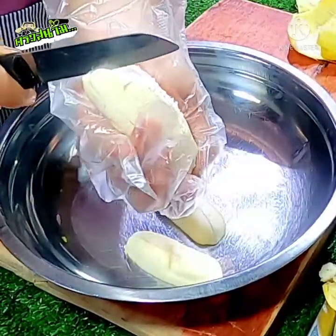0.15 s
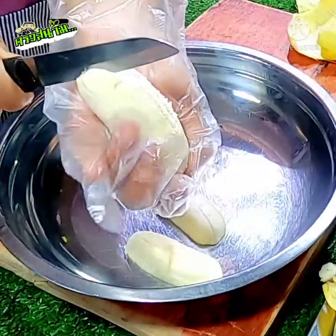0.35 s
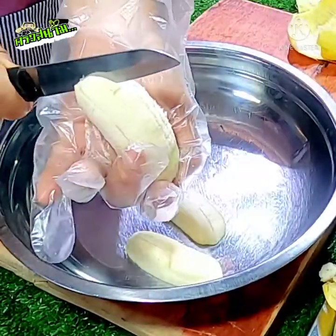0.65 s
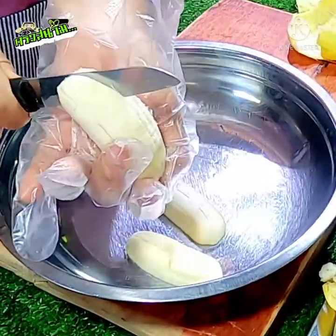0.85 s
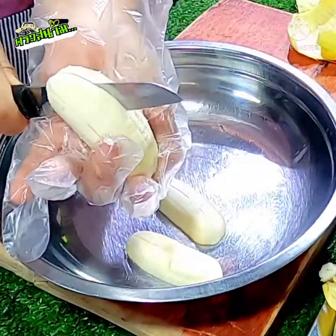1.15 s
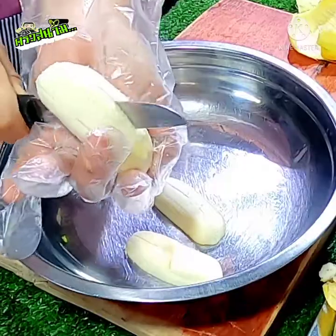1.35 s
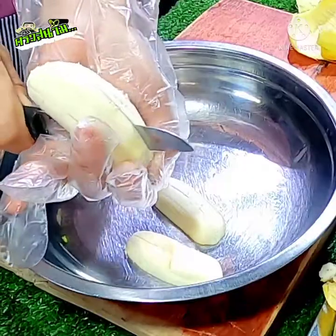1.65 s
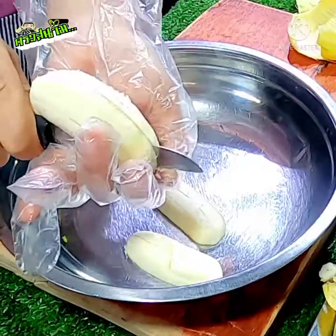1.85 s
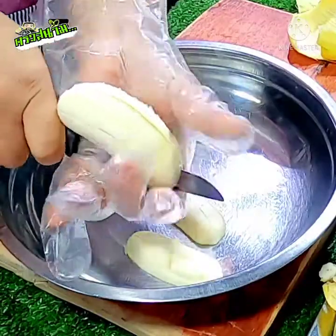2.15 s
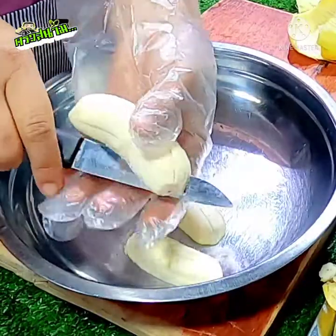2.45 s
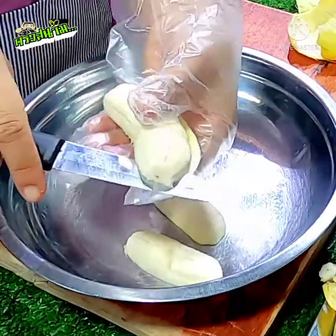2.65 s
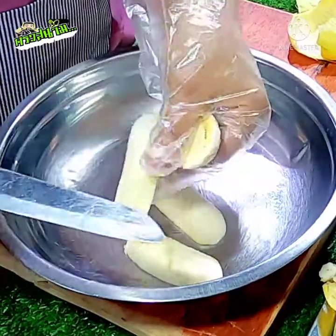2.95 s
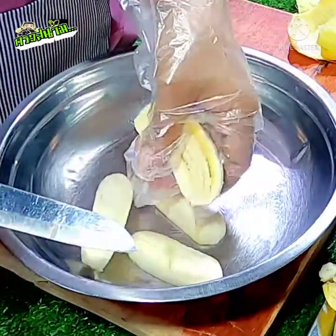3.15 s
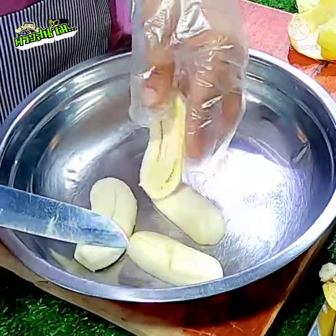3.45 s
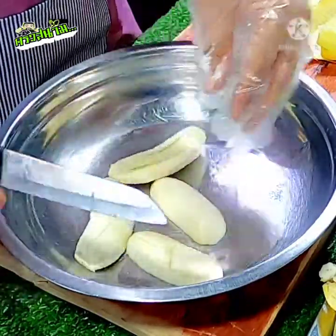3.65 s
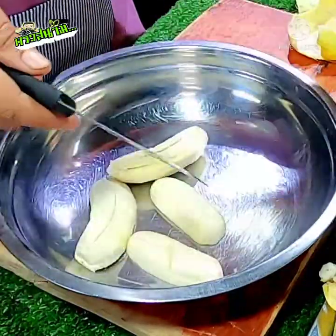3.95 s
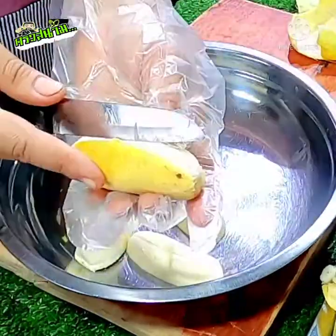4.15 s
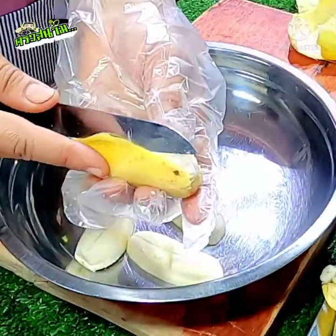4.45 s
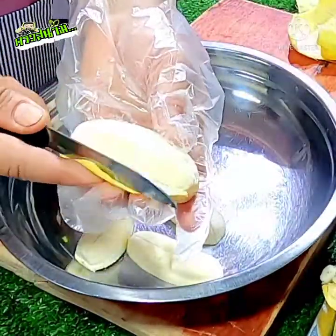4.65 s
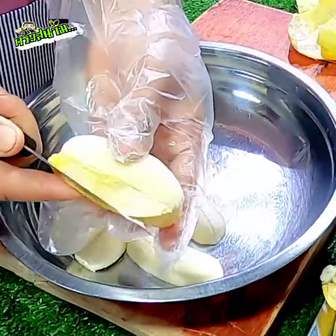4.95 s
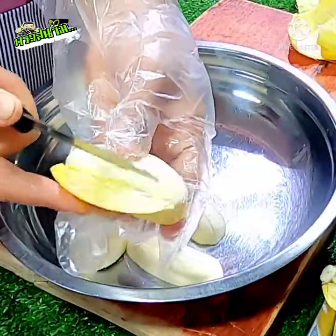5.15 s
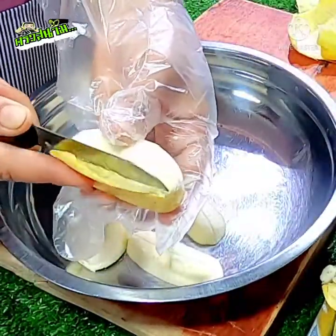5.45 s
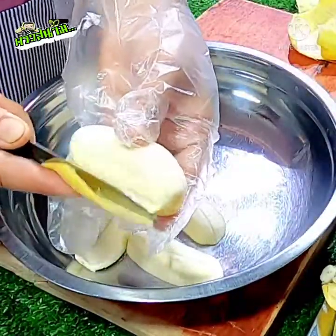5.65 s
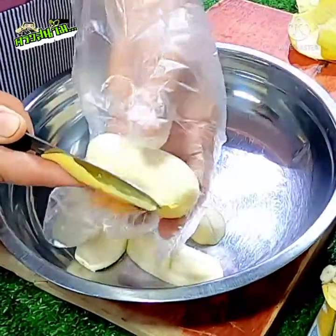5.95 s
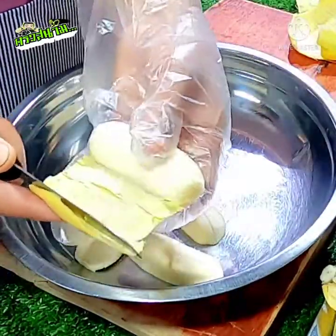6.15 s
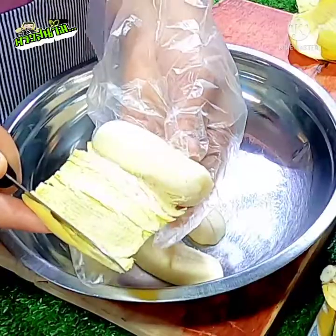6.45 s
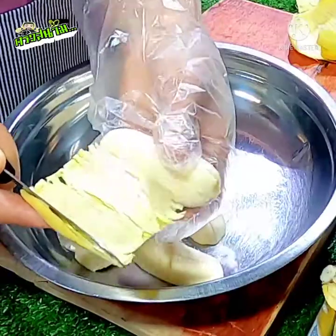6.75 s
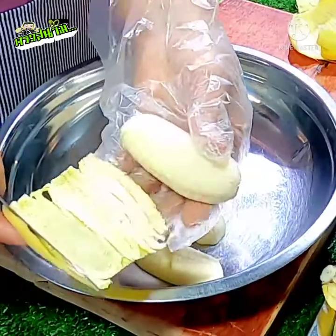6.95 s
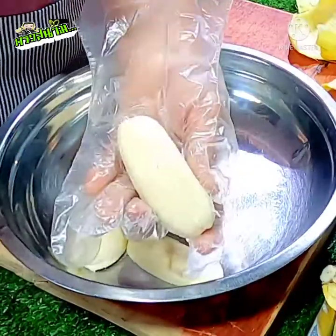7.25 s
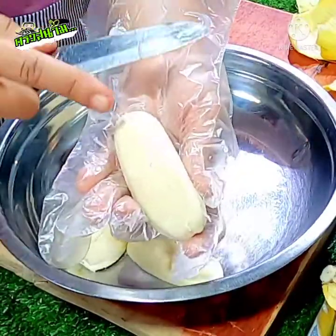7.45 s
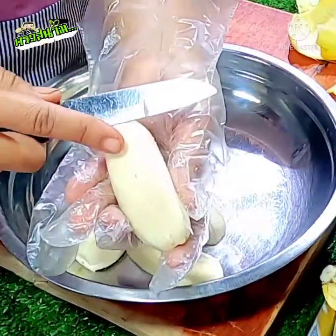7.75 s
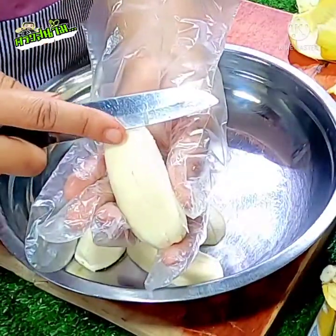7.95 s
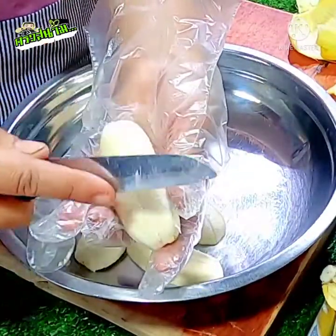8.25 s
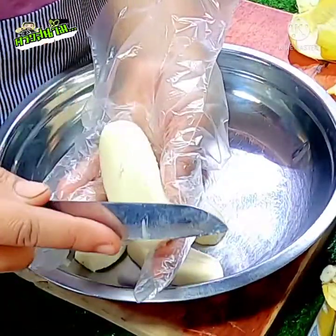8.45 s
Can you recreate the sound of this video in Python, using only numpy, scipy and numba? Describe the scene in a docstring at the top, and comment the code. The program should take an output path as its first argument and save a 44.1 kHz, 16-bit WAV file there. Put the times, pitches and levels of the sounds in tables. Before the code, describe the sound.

Very close to a stereo microphone, a thin plastic glove crackles and rustles as hands work soft fruit over a metal bowl. Low, lumpy air thumps buffet the first two seconds, later returning lightly, often to the left. The crinkling grows densest around two and a half to four seconds, when one dull wet knock hits the bowl, then comes in separate grips and thins out before two soft blade scrapes. A faint distant hum lies beneath.

```python
"""Gloved hands, fruit and metal bowl

A thin plastic glove crinkles close to a two-port microphone while hands split soft fruit over a metal bowl.
Each crease of the film snaps with a short burst that the bowl scatters; busy hands merge the snaps into a rustle.
A piece of fruit knocks the bowl as ringing modes and a slap; the blade's scrapes and film squeaks are narrow noise.
Gusts of air buffet each port on its own as lumpy low noise, over a low, distant hum."""
import sys
import numpy as np
from scipy import signal
from scipy.fft import rfft, irfft, next_fast_len
from scipy.io import wavfile
from scipy.ndimage import uniform_filter1d
from numba import njit

SR = 44100
rng = np.random.default_rng(int(sys.argv[2]) if len(sys.argv) > 2 else 0)


def dump(signal):
    """Clip the signal to [-1, 1] and save it as 16-bit WAV at the path in sys.argv[1]."""
    limited = np.clip(np.atleast_2d(signal).T, -1, 1)
    pcm = np.round(limited * 32767).astype(np.int16)
    wavfile.write(sys.argv[1], SR, pcm)


N = 379215  # length in samples

# Microphone ports, phase: pitch_hz, left_lead_rad
PORT_PHASE = [(0, 0), (4570, -.6), (6630, -1.7), (8270, .1), (10900, -.5), (14000, 0), (15400, 1.5)]
# Microphone ports, balance: pitch_hz, left_minus_right_db
PORT_BALANCE = [(60, 1), (300, -.5), (1300, 0), (2400, 1), (4400, .3), (8100, -2.5), (15000, -3)]
EDGE_HZ = 15700  # upper band limit of the recorder

# Spectrum of the distant hum and hiss: pitch_hz, relative_db
HUM_SPECTRUM = [(53, -43), (90, -17), (180, 0), (300, -15.5), (467, -11.5), (706, -18), (1290, -9.5),
                (3080, -12.5), (5000, -17.5), (7490, -23), (10000, -32.5), (14700, -44), (16000, -57)]
# How alike the hum is at the two ports: pitch_hz, likeness (0 to 1)
HUM_LIKENESS = [(60, 0.85), (240, 0.67), (950, 0.52), (3770, 0.4), (15000, 0.12)]
HUM_DB = -59

# Light air between gusts: time_s, level_db, throb_db (against that level)
BREEZE = [(0, -47.5, -21), (.9, -43, -22), (1.25, -57, -12), (2.2, -50, -15), (2.4, -57, -21),
          (2.8, -67, -20), (3.17, -74, -13), (3.23, -56, -6), (3.55, -68, -22), (3.74, -61, 1),
          (4.0, -60.5, -18), (4.3, -52.5, -18), (4.6, -46.5, -5), (5.15, -57.5, -21), (5.35, -42.5, -8.5),
          (5.75, -52, -17), (6.2, -48.5, -18), (6.4, -60.5, -25), (6.9, -51.5, -19), (7.4, -62, -11),
          (8.15, -64, -7), (8.6, -58, -7)]
BREEZE_PAN_DB = 2.5  # left minus right
# Gusts: peak_s, level_db, half_width_s (power falls to 1/e), left_minus_right_db, throb_db (against the gust)
GUSTS = [(.13, -44, 0.015, -3, 5), (.21, -24, 0.054, 4.5, -2), (.35, -29.5, 0.056, -0.5, -9.5),
         (.53, -31.5, 0.075, -3, -1), (.67, -31.5, 0.099, 1, -7), (.98, -37, 0.06, 12, -9),
         (1.15, -54, 0.037, 18, -18), (1.4, -45, 0.065, 6, -8.5), (1.55, -41, 0.024, 15, -1.5),
         (1.7, -33.5, 0.047, 8, -9.5), (1.797, -30, 0.031, 6, 0), (1.9, -31.5, 0.02, 11, 0),
         (2.03, -35.5, 0.086, 8, -3), (2.13, -47, 0.022, 10, -13), (2.27, -37.5, 0.023, 2, -14),
         (3.24, -63, 0.036, 0, -5), (3.38, -60, .04, 0, -13), (3.62, -54, 0.029, -1, -29),
         (3.88, -65, .05, -6, -17), (4.25, -37.5, 0.034, 5, -7.5), (4.64, -40, 0.047, 16, -7),
         (4.72, -44.5, 0.02, 4, 3.5), (4.81, -51, 0.023, 14, -28), (4.91, -53, 0.025, 0, -29),
         (5.0, -38.5, 0.054, 5.5, -15), (5.1, -44, 0.017, 5, -16), (5.39, -44, 0.047, 18, -2),
         (5.46, -48, .04, 11, 0), (5.53, -32.5, 0.039, 23, -25), (5.63, -44.5, 0.04, 16, -2),
         (5.84, -47, 0.02, 15, 3), (5.93, -52, 0.0092, 24, 10.5), (5.98, -45, .025, 7, -22),
         (6.08, -37, 0.061, 21, -11.5), (6.66, -45, 0.058, 10, -11), (6.8, -53, 0.067, 7, -11),
         (7.47, -50, 0.037, -5, -23), (7.71, -53, 0.066, 1, -16), (7.95, -50, 0.028, 4, -20),
         (8.05, -52.5, 0.036, -4, 6.5)]
# Spectrum of the buffeting: pitch_hz, relative_db
BUFFET_SPECTRUM = [(12, -11), (25, 5.5), (45, -0.5), (62, -7), (90, -37), (200, -70)]
# Spectrum of the throb above the buffeting: pitch_hz, relative_db
THROB_SPECTRUM = [(35, -25), (60, 2.5), (85, 1), (125, -7.5), (180, -19.5), (400, -103)]
# Spectrum of the flutter above the throb: pitch_hz, relative_db
FLUTTER_SPECTRUM = [(70, -70), (130, -0.5), (210, 1.5), (290, -9.5), (380, -19), (550, -29), (1000, -60)]
# Flutter over time: time_s, level_db
FLUTTER_LEVEL = [(0.0, -66), (0.04, -82), (0.12, -48), (0.21, -32.5), (.29, -50), (0.38, -70), (0.53, -56),
                 (0.88, -70), (0.98, -50.5), (1.03, -67), (1.12, -73), (1.7, -68), (1.8, -52), (1.84, -68),
                 (1.92, -51), (2.03, -84), (2.08, -52), (2.13, -67), (2.94, -76.5), (3.97, -59.5),
                 (4.04, -66), (4.24, -56), (4.5, -78), (4.72, -55), (4.76, -63.5), (5.31, -68),
                 (5.36, -52.5), (5.53, -61.5), (6.78, -59), (7.02, -60.5), (7.5, -59.5), (7.7, -55),
                 (7.79, -55), (7.84, -55), (7.92, -58), (8.05, -57.5), (8.2, -58), (8.6, -58.5)]
FLUTTER_LIKENESS = 0.61  # left with right
# Wavering band above the flutter: time_s, level_db
UPPER_RUMBLE_LEVEL = [(0, -85), (3.6, -83), (3.96, -65.5), (4.5, -76.5), (5.4, -70), (6.2, -70), (7.3, -74),
                      (7.65, -65), (7.85, -69.5), (8.0, -68), (8.6, -73)]
UPPER_HZ, UPPER_WANDER_HZ, UPPER_WIDTH_HZ = 343, 45, 140
# Eddies that pop on the left port: centre_s, peak_db, half_length_s
POPS = [(0.694, -26, 0.034), (0.987, -19, 0.021), (1.137, -27, 0.029), (4.257, -34, 0.021),
        (4.653, -23.5, 0.017), (4.718, -21.5, 0.016), (5.006, -29.5, 0.018), (6.085, -20.5, 0.034),
        (8.023, -37, 0.019), (8.068, -48, 0.014)]
# Sharp eddies during the early gusts, lagging in phase at the right port: centre_s, peak_db, pitch_hz
KICKS = [(.116, -38, 170), (.154, -31.5, 300), (.198, -40, 328), (.207, -25, 237), (.219, -15, 173),
         (0.247, -21, 160), (.272, -31, 194)]
KICK_WIDTH_CYCLES, KICK_LAG_RAD = 0.47, 1.6

# Short modes of the loaded bowl: pitch_hz, level_db (against KNOCK_DB), t60_s
BOWL_MODES = [(150, -14, .05), (510, -3, 0.018), (1050, 1, 0.021), (1360, -3, 0.018), (3220, 1, .012),
              (3890, 4, 0.013), (4860, 1, 0.01)]
KNOCK_S, KNOCK_DB, KNOCK_RISE_CYCLES = 3.7382, -24, 0.98
SLAP_DB, SLAP_HZ, SLAP_T60_S = -23, 3380, 0.011  # the wet slap of the blow itself

# The blade scrapes along the fruit: start_s, length_s, level_db (at the start)
SCRAPES = [(8.353, 0.104, -51.5), (8.457, .13, -53)]
SCRAPE_HZ, SCRAPE_WIDTH_HZ, SCRAPE_FADE_DB = 900, 820, -4.5
# Film rubbing on moist fruit: start_s, length_s, pitch_hz, level_db
SQUEAKS = [(7.434, 0.08, 1950, -50.5), (7.982, 0.055, 4330, -62), (8.0, 0.065, 3150, -57.5),
           (8.068, .016, 5100, -62)]
SQUEAK_WIDTH_HZ, SQUEAK_PEAK = 300, .2  # peak as a share of the length

# Colour of the plastic film: pitch_hz, relative_db
FILM_SPECTRUM = [(150, -60), (300, -3), (500, -10.5), (720, -10), (950, -9.5), (1100, -8), (1580, -4.5),
                 (1910, 1.5), (2670, 1.5), (4730, 2), (6820, -2.5), (7570, -1.5), (8260, -7.5),
                 (11000, -10.5), (14700, -14.5), (16000, -9)]
# How alike the film sounds at the two ports: pitch_hz, likeness (0 to 1)
FILM_LIKENESS = [(200, .75), (600, .92), (1600, .92), (3100, .86), (5000, .76), (7000, .62), (15000, .42)]
SNAP_T60_S, SNAP_SWELL_S = .009, .0017
SECOND_FLIP_S, SECOND_FLIP_DB = (0.0017, 0.00632), (-13, -3)  # ranges of delay and of level offset
RING_WIDTH_HZ, RING_DB = 190, 1.5  # the facet beside the crease rings briefly

# How busily the gloved hand works between its grips: time_s, rustle_db
HANDS = [(0, -50), (.4, -55), (.485, -57.5), (.53, -53.5), (.88, -56), (1.19, -66), (1.3, -57),
         (1.36, -55.5), (1.72, -53.5), (2.27, -50), (2.5, -41.5), (2.78, -42.5), (3.6, -45), (4.15, -48.5),
         (4.33, -63), (4.73, -62), (4.78, -50), (4.83, -48), (4.875, -43.5), (5.05, -47), (5.2, -53),
         (5.6, -63.5), (5.8, -54), (5.9, -48.5), (6.25, -49), (6.48, -45), (6.57, -43), (6.66, -47),
         (6.8, -43), (6.92, -48), (7.45, -51), (7.65, -61), (8.05, -70), (8.33, -83), (8.6, -65)]
# Each grip or shift of the fingers crushes the film for a moment: start_s, rustle_db, length_s
GRIPS = [(0, -44.5, 0.018), (0.132, -47, 0.13), (0.271, -53, 0.14), (0.499, -45.5, 0.31),
         (0.941, -48, 0.19), (1.363, -44.5, 0.049), (1.412, -46.5, 0.2), (1.515, -44, 0.17),
         (1.751, -49, 0.23), (1.901, -45, 0.18), (2.088, -44, 0.12), (2.294, -39, 0.2),
         (2.475, -40.5, 0.052), (2.815, -42, 0.036), (2.897, -39.5, 0.064), (3.115, -40.5, 0.11),
         (3.237, -43.5, 0.32), (3.38, -40, 0.043), (3.48, -42, 0.058), (3.538, -37, 0.033),
         (3.632, -37, 0.093), (3.712, -49.5, 0.15), (3.91, -46, 0.057), (4.062, -45, 0.036),
         (4.168, -39, 0.096), (4.382, -54.5, 0.083), (4.55, -50.5, 0.1), (4.844, -45, 0.034),
         (4.887, -46, 0.044), (4.94, -43.5, 0.098), (5.156, -52, 0.074), (5.29, -50.5, 0.059),
         (5.396, -50.5, 0.14), (5.8, -37.5, 0.058), (5.925, -43, 0.19), (6.116, -37.5, 0.062),
         (6.34, -41.5, 0.064), (6.402, -37, 0.056), (6.67, -53, 0.035), (6.757, -41, 0.082),
         (7.037, -44, 0.098), (7.152, -48.5, 0.17), (7.388, -52.5, 0.074), (7.636, -54.5, 0.059),
         (8.339, -47, 0.1), (8.454, -45, 0.038), (8.506, -53.5, .07)]
GRIP_RISE_S, GRIP_SAG_DB, GRIP_RELEASE_DB_PER_S = .03, -4.5, 256
SNAPS_PER_S, SIZE_SPREAD_DB = 1900, 2.6  # the rate is that of a rustle at -47 dB
# Snaps and short bursts above the rustle: start_s, level_db (nominal peak), pitch_hz, left_minus_right_db
BURSTS = [(0.0393, -44, 4180, 0.0), (0.096, -40, 3920, 0.0), (0.1225, -32, 2990, -1.0),
          (0.1526, -34, 4570, -2), (0.1715, -28, 4880, -3), (0.2468, -30, 2610, -3),
          (0.2783, -38, 2630, 0.0), (0.3142, -44, 2560, 0.5), (0.422, -37.5, 2550, 0.5),
          (0.5194, -34, 3790, -0.5), (0.546, -28, 2610, -2), (0.5561, -25.5, 3180, 0.0),
          (0.5927, -28.5, 2630, 0.0), (0.6192, -25.5, 5230, -3), (0.6767, -35, 3100, -0.5),
          (0.739, -41, 2000, -1.5), (0.754, -31, 5280, -2), (0.825, -29.5, 4260, 0.5),
          (0.9033, -36.5, 4360, 0.5), (0.9512, -28.5, 4070, -1), (0.995, -30, 4840, 0.0),
          (1.0706, -27.5, 4300, 1.5), (1.109, -30, 2530, -2), (1.1214, -30, 1950, 1.0),
          (1.1364, -32.5, 2640, 1.0), (1.1747, -37, 5270, -0.5), (1.2077, -46, 5060, 0.5),
          (1.2301, -39, 3770, 0.5), (1.274, -32, 2770, -1), (1.293, -35, 3100, 1.0), (1.3252, -32, 4150, 3),
          (1.364, -29.5, 4500, -0.5), (1.373, -36, 2540, -0.5), (1.3859, -27, 4260, 1),
          (1.391, -32, 4240, 0.5), (1.4313, -30, 2710, 1.5), (1.4568, -27, 2600, 0), (1.4835, -31, 2590, 3),
          (1.519, -33, 4580, 4), (1.5655, -32, 3090, 0.0), (1.6337, -27, 3000, 0.0), (1.6928, -26, 3060, 0),
          (1.7404, -38, 2650, 0.0), (1.7699, -33, 5250, -1), (1.815, -36, 3040, 0.0),
          (1.862, -30.5, 3320, -2), (1.904, -29, 2100, 0.0), (1.9395, -24.5, 3090, 2),
          (1.9744, -29, 3420, 0.5), (1.9986, -28, 2660, 0.5), (2.0467, -30.5, 3350, 0.0),
          (2.1026, -28, 2340, 0.0), (2.137, -29, 4560, 0.0), (2.208, -35, 2210, -0.5),
          (2.303, -26, 2680, 1), (2.3446, -21.5, 2500, -0.5), (2.43, -33, 2310, -5),
          (2.4514, -30, 2940, 0.5), (2.4818, -26, 3850, 3), (2.487, -19.5, 2510, 1.0),
          (2.512, -18.5, 1730, 1), (2.7232, -24.5, 3710, 0.5), (2.8174, -38, 4370, -0.5),
          (2.8554, -22.5, 4430, 0.5), (3.016, -30, 2690, -0.5), (3.0473, -22.5, 4860, 0.0),
          (3.1162, -26, 1950, -0.5), (3.151, -34, 4190, 0.5), (3.164, -21, 1820, -3),
          (3.1877, -24, 4720, -0.5), (3.208, -27, 2610, 0.5), (3.269, -26, 2030, 0.0),
          (3.321, -26, 2730, 0.0), (3.3598, -32, 2620, 0.5), (3.562, -21.5, 3750, 2),
          (3.6401, -32, 3060, 0.0), (3.6994, -26, 1830, -4), (3.768, -30, 1250, 0.0),
          (3.8791, -39, 4350, -3), (3.918, -33, 3250, -1.0), (3.9553, -27, 2000, 1),
          (3.959, -20.5, 3700, -2), (3.973, -31, 2970, -2.0), (4.027, -39, 2480, -2.0),
          (4.071, -36, 5650, -2.0), (4.082, -31, 2100, -3.0), (4.0858, -24.5, 3600, -5),
          (4.158, -35, 4330, -3.0), (4.192, -35, 3880, -11), (4.2454, -28, 5830, -7),
          (4.341, -39, 5190, 0.0), (4.3859, -37.5, 2350, -1), (4.4119, -44, 3990, 0.5),
          (4.4285, -39, 3770, 0.5), (4.4588, -38, 3500, 0.0), (4.4777, -36, 4930, 0.5),
          (4.5022, -42, 4190, 1.5), (4.5511, -42, 2780, 0.0), (4.562, -39, 2810, 0.0),
          (4.5748, -29.5, 4240, 2), (4.6312, -31, 2440, -1), (4.6658, -39, 1990, 1.0),
          (4.7644, -41, 2990, 0.5), (4.7775, -33, 4550, 0.5), (4.8309, -35, 4280, 0.0),
          (4.8683, -27, 4200, -0.5), (4.969, -30, 2560, -3), (5.0082, -26, 3760, -7),
          (5.119, -28.5, 4360, 2), (5.1706, -39, 3160, 0.0), (5.1924, -34, 3930, 1.0),
          (5.1998, -29.5, 1840, 0.5), (5.2103, -34, 1940, 0.0), (5.296, -41, 5290, 0.5),
          (5.3143, -33.5, 3910, 2), (5.3445, -33.5, 2910, 0.0), (5.4005, -32, 4800, -0.5),
          (5.4227, -29, 2650, 1.0), (5.4374, -30, 5030, 0.5), (5.4504, -38, 1890, 0.0),
          (5.4787, -32, 4540, 1.0), (5.5126, -41, 2020, -0.5), (5.5263, -34, 2720, 0.5),
          (5.5665, -35.5, 7340, -1.5), (5.5852, -41, 3950, -2), (5.6308, -38, 3210, -5),
          (5.682, -42, 4870, 6), (5.7593, -41, 3160, 1.0), (5.8237, -29, 3220, 0.0),
          (5.8404, -23.5, 3800, -0.5), (5.9748, -28, 3070, 0.5), (6.0036, -36, 2720, -4),
          (6.122, -20, 4010, 0), (6.1526, -22, 1960, 0.0), (6.3091, -42, 4160, 1.0),
          (6.3364, -30, 2370, -3), (6.3543, -34, 2400, 0.5), (6.4018, -28, 2020, 0.0),
          (6.4328, -23.5, 2020, -3), (6.48, -27, 2980, 2), (6.532, -35, 4040, 0.0),
          (6.5717, -29, 2330, 0.0), (6.641, -35, 4130, 0.0), (6.6828, -28, 2290, 0.0),
          (6.7042, -29, 4990, 0.0), (6.7505, -33, 2400, -4), (6.7854, -27, 5200, 0.0),
          (6.8187, -21, 5040, 4), (6.8322, -28, 2510, 0.5), (7.0312, -29, 4300, 3),
          (7.0653, -35, 2460, 0.0), (7.1314, -42, 3990, 0.0), (7.1915, -33, 4970, -0.5),
          (7.2105, -29, 3070, 0.0), (7.2462, -30, 2520, -2), (7.3203, -43, 4830, 0.0),
          (7.3921, -41, 3690, 1.5), (7.5243, -47, 3270, 0.0), (7.5465, -43, 3310, 0.0),
          (7.5643, -37, 2420, 1.0), (7.6493, -27.5, 4360, 1), (7.7308, -38, 2110, 1.0),
          (7.8386, -44, 2820, -0.5), (7.868, -34, 2470, -3), (8.0725, -41, 2480, 2.0),
          (8.095, -35.5, 2620, 1), (8.169, -44, 2730, -1), (8.354, -33, 2560, 0.5), (8.4694, -33, 3420, 3),
          (8.563, -41, 3100, 0)]
BURST_ENERGY_DB = 9.5  # energy of a burst over its nominal peak

# Hollow between hand and bowl: time_s, resonance_hz, boost_db, octave_boost_db
HOLLOW = [(0, 1320, -4, -16), (1, 1300, 0.5, -14), (1.8, 1310, -11, -9), (2.3, 1240, 1, -2.5),
          (2.9, 1280, -1, -10), (3.15, 1240, 4.5, -6), (3.8, 1180, 4, -10), (4.2, 1270, 5.5, -14),
          (5, 1297, -1, -15.5), (6.5, 1277, 5.5, -5), (7.5, 1300, -5, -5.5), (8.3, 1260, 7.5, -8),
          (8.6, 1280, 14, -8)]
HOLLOW_WIDTH_HZ, OCTAVE_RATIO, OCTAVE_WIDTH_HZ = 208.0, 1.994, 143
# Further overtones of the hollow: multiple of the resonance, width_hz, mid_boost_db
OVERTONES = [(1.55, 109, -20), (3.03, 118, -21)]
OVERTONE_WAVER_DB = 3.5


def gain_of(db):
    """Decibels to amplitude."""
    return 10 ** (np.asarray(db) / 20)


def evened(x):
    """Scales to rms 1."""
    return x / np.sqrt(np.mean(np.square(x)) + 1e-20)


def read(points, hz):
    """Reads a spectrum table on a log-frequency axis."""
    f, value = np.transpose(points)
    return np.interp(np.log(hz + 1), np.log(f + 1), value)


def curves(rows):
    """Every column after the time, interpolated sample by sample."""
    s, *columns = np.transpose(rows)
    return [np.interp(np.arange(N) / SR, s, c) for c in columns]


def slow(cutoff_hz, count=2):
    """Rows of slow chance, low-passed noise of rms 1."""
    b, a = signal.butter(2, cutoff_hz, fs=SR / 32)
    x = signal.lfilter(b, a, rng.standard_normal((count, N // 32 + 1)))
    return evened([np.interp(np.arange(N) / 32, np.arange(len(row)), row) for row in x])


def coloured(points):
    """Two unrelated noises of one spectrum."""
    size = next_fast_len(N)
    spectrum = gain_of(read(points, np.fft.rfftfreq(size, 1 / SR)))
    z = rfft(rng.standard_normal((2, size))) * spectrum
    return evened(irfft(z, size)[:, :N])


def resonate(x, hz, width):
    """Shifts the curve hz down to zero, smooths, and shifts back: a resonance of gain 1."""
    turn = np.exp(2j * np.pi * np.cumsum(hz) / SR)
    r = np.exp(-np.pi * width / SR)
    return 2 * (turn * signal.lfilter([1 - r], [1, -r], x / turn)).real


def resonate_twice(x, hz, width):
    """Two equal resonances in a row give a band with steeper sides."""
    return resonate(resonate(x, hz, width), hz, width)


def at_ports(a, b, hz, likeness):
    """Two spectra become left and right: partly alike, with the phase and balance of the port pair."""
    same = np.clip(read(likeness, hz), -1, 1)
    half = gain_of(read(PORT_BALANCE, hz) / 2) * np.exp(.5j * read(PORT_PHASE, hz))
    return np.array([a * half, (same * a + np.sqrt(1 - same ** 2) * b) / half])


def shared(pan_db):
    """The two ports share the power of the air: factors that add up to 4, so 2 each when centred."""
    side = gain_of(np.array([[1], [-1]]) * pan_db)
    return 4 * side / side.sum()


def hum():
    """Distant surroundings and the microphone's hiss: noise that drifts in patches of time and pitch."""
    frames, hz = N // 256 + 5, np.fft.rfftfreq(1024, 1 / SR)
    a, b, c, d, patches = rng.standard_normal((frames, 513, 5)).T
    patches = evened(uniform_filter1d(uniform_filter1d(patches, 6, 0), 14, 1))
    z = at_ports((a + 1j * b).T, (c + 1j * d).T, hz, HUM_LIKENESS).swapaxes(1, 2)
    z *= gain_of(read(HUM_SPECTRUM, hz)[:, None] + 1.8 * patches)
    noise = signal.istft(z, nperseg=1024, noverlap=768)[1][:, :N]
    return gain_of(HUM_DB) * evened(noise)


def gusts():
    """Lumpy pressure at each port, its buffet and throb unrelated left and right; gusts swell and pass."""
    t = np.arange(N) / SR
    breeze_db, breeze_throb_db = curves(BREEZE)
    push = gain_of(breeze_db) ** 2 * shared(BREEZE_PAN_DB)
    throb = push * gain_of(breeze_throb_db) ** 2
    for s, db, width, pan_db, throb_db in GUSTS:
        at = slice(max(round((s - 4 * width) * SR), 0), round((s + 4 * width) * SR))
        power = gain_of(db) ** 2 * np.exp(-((t[at] - s) / width) ** 2) * shared(pan_db)
        push[:, at] += power
        throb[:, at] += power * gain_of(throb_db) ** 2
    lumps = evened(gain_of(1.84 * slow(7.9)))
    # the flutter leans slightly to the port that is pushed harder
    flutter = gain_of(curves(FLUTTER_LEVEL)[0]) * (2 * push / push.sum(0)) ** 0.14
    left, other = coloured(FLUTTER_SPECTRUM)
    right = FLUTTER_LIKENESS * left + np.sqrt(1 - FLUTTER_LIKENESS ** 2) * other
    flutter = flutter * [left, right]
    buffet = np.sqrt(push) * coloured(BUFFET_SPECTRUM)
    return lumps * (buffet + np.sqrt(throb) * coloured(THROB_SPECTRUM) + flutter)


def upper_rumble():
    """A soft low band of noise whose pitch and level waver."""
    wander, swell = slow(7.1)
    hz = UPPER_HZ + UPPER_WANDER_HZ * wander
    band = resonate_twice(rng.standard_normal(N), hz, UPPER_WIDTH_HZ)
    return gain_of(curves(UPPER_RUMBLE_LEVEL)[0] + 1.6 * swell) * evened(band)


def pops():
    """One push and one pull of pressure on the left port."""
    out, t = np.zeros((2, N)), np.arange(N) / SR
    for s, db, half_length in POPS:
        at = slice(round((s - half_length) * SR), round((s + half_length) * SR))
        u = (t[at] - s) / (half_length / 6)
        out[0, at] -= gain_of(db) * u * np.exp(.5 - .5 * u ** 2)
    return out


def kicks():
    """Short low knocks of air, about one cycle under a bell-shaped envelope."""
    out, u = np.zeros((2, N)), np.arange(-600, 600) / SR
    for s, db, hz in KICKS:
        wave = np.cos(2 * np.pi * hz * u - np.array([[0], [KICK_LAG_RAD]]))
        envelope = np.exp(-.5 * (u * hz / KICK_WIDTH_CYCLES) ** 2)
        out[:, round(s * SR) - 600:][:, :1200] += gain_of(db) * envelope * wave
    return out


def snap(centre_hz, t60, octaves, skirt_db, tick_db, second_db):
    """A crease flips: a sharp tick and its dying scatter, strongest around the pitch of the crease."""
    t, hz = np.arange(-128, 896) / SR, np.fft.rfftfreq(1024, 1 / SR)
    after = np.maximum(t - SNAP_SWELL_S, 0)  # the snap swells in over a few milliseconds, then dies away
    tick = gain_of(tick_db - 60 * after / 0.0024)
    body = gain_of(-60 * after / max(t60, .003))
    tail = gain_of(-26 - 60 * after / 0.08)
    scatter = (tick + body + tail) * np.clip(t / SNAP_SWELL_S, 0, 1) ** 2
    later = round(rng.uniform(*SECOND_FLIP_S) * SR)  # the other end of the crease flips a moment after
    second = np.pad(scatter, (later, 0))[:1024]
    scatter = scatter + gain_of(second_db + rng.uniform(*SECOND_FLIP_DB)) * second
    a, b = rfft(rng.standard_normal((2, 1024)) * scatter)
    above = np.log2((hz + 1) / centre_hz)
    # little sound below the pitch of the crease
    skirt = gain_of(skirt_db + 3.3 * np.minimum(above, 0) - 0.43 * np.maximum(above, 0))
    ring_hz = centre_hz * rng.uniform(0.952, 1.087)
    ring = gain_of(RING_DB) / (1 + 2j * (hz - ring_hz) / RING_WIDTH_HZ)
    colour = np.exp(-.5 * (above / octaves) ** 2) + skirt + ring
    return irfft(at_ports(a, b, hz, FILM_LIKENESS) * colour * gain_of(read(FILM_SPECTRUM, hz)))


def knock():
    """A dull blow slaps the metal and rings the short modes of the loaded bowl."""
    out, t, at = np.zeros((2, N)), np.arange(3000) / SR, round(KNOCK_S * SR)
    ring = np.zeros(3000)
    for hz, db, t60 in BOWL_MODES:
        rise = np.minimum(hz * t / KNOCK_RISE_CYCLES, 1)
        ring += gain_of(db - 60 * t / t60) * rise * np.sin(2 * np.pi * hz * t)
    slap = snap(SLAP_HZ, SLAP_T60_S, octaves=0.77, skirt_db=-4.0, tick_db=-2.0, second_db=3.0)
    out[:, at:at + 3000] = gain_of(KNOCK_DB) * ring
    out[:, at - 128:at + 896] += gain_of(SLAP_DB) * slap / abs(slap.mean(0)).max()
    return out


def scrapes():
    """A dull, grainy rub that starts at once and fades: spiky noise in a broad band."""
    out = np.zeros(N)
    for s, length, db in SCRAPES:
        u = np.arange(round(length * SR)) / (length * SR)
        grit = rng.standard_normal(len(u)) ** 3
        rub = resonate_twice(grit, np.full(len(u), SCRAPE_HZ), SCRAPE_WIDTH_HZ)
        closing = np.minimum(10 - 10 * u, 1)  # the last tenth closes to silence
        out[round(s * SR):][:len(u)] += gain_of(db + SCRAPE_FADE_DB * u) * closing * evened(rub)
    return out


def squeaks():
    """Stick and slip in a narrow band: a short rough whistle that trails off."""
    out = np.zeros(N)
    for s, length, hz, db in SQUEAKS:
        pitch = np.full(round(length * SR), hz)
        u = np.linspace(0, 1, len(pitch)) / SQUEAK_PEAK
        tone = resonate_twice(rng.standard_normal(len(pitch)) ** 3, pitch, SQUEAK_WIDTH_HZ)
        out[round(s * SR):][:len(pitch)] += gain_of(db) * evened(tone) * u * np.exp(1 - u)
    return out


def handling():
    """Rustle level in dB: every grip rises quickly, sags while it lasts and lets go."""
    t, power = np.arange(N) / SR, gain_of(curves(HANDS)[0]) ** 2
    for s, db, length in GRIPS:
        at = slice(round(s * SR), round((s + length + .3) * SR))
        u = t[at] - s
        fall_db = GRIP_SAG_DB * u / length - GRIP_RELEASE_DB_PER_S * np.maximum(u - length, 0)
        power[at] += (np.clip(u / GRIP_RISE_S, 0, 1) * gain_of(db + fall_db)) ** 2
    return 10 * np.log10(power)


@njit
def add(out, starts, sizes, kinds, sounds):
    """Drops each sound into the mix at its start."""
    for e in range(len(starts)):
        for c in range(2):
            out[c, starts[e]:starts[e] + 1024] += sizes[e] * sounds[kinds[e], c]


def rustle(count=96):
    """Random snaps of many creases; the harder the hand works, the denser they come."""
    level_db = handling()
    per_s = np.clip(SNAPS_PER_S * gain_of(1.2 * (level_db + 47)), 700, 12000)
    clumps = gain_of(1.5 * slow(110, count=1)[0])  # snaps set each other off in clumps
    when, how_big, which, sign = rng.random((N, 4)).T
    at = np.flatnonzero(when < per_s * clumps / clumps.mean() / SR)
    size = gain_of(SIZE_SPREAD_DB * np.minimum(-np.log(how_big[at] + 1e-9), 4.2))
    size *= np.sign(sign[at] - .5) / np.sqrt(np.mean(size ** 2))
    size *= gain_of(level_db[at]) * np.sqrt(SR / per_s[at])  # denser snaps are each smaller for their level
    crease, pitch_hz = (which[at] * count).astype(int), np.geomspace(500, 14000, count)
    # now one size of crease leads, now another
    size *= gain_of(3.2 * slow(11., count=12)[crease * 12 // count, at])
    t60 = .011 * (pitch_hz / 3500) ** -.35 * rng.uniform(0.66, 2.95, count)  # small creases tend to die sooner
    sounds = np.array([snap(hz, d, octaves=0.42, skirt_db=-4.5, tick_db=2.0, second_db=-1.6)
                       for hz, d in zip(pitch_hz, t60)])
    mean_energy = (sounds.mean(1) ** 2).sum(1).mean()
    out = np.zeros((2, N + 1024))
    add(out, at, size, crease, sounds / np.sqrt(mean_energy))
    return out[:, 128:N + 128]


def bursts():
    """Snaps and short bursts that stand out of the rustle, each noise scattered around its own pitch."""
    out = np.zeros((2, N + 1024))
    for s, db, hz, pan_db in BURSTS:
        sound = snap(hz, SNAP_T60_S, octaves=0.7, skirt_db=1.5, tick_db=-1, second_db=-7)
        at = round(s * SR)
        gain = gain_of(db + np.array([[.5], [-.5]]) * pan_db + BURST_ENERGY_DB)
        out[:, at:at + 1024] += gain * sound / np.linalg.norm(sound.mean(0))
    return out[:, 128:N + 128]


def hollow(x):
    """The air between hand and bowl lifts a low band and its octave; other overtones waver as the hand turns."""
    hz, low_db, octave_db = curves(HOLLOW)
    waver = gain_of(OVERTONE_WAVER_DB * slow(4., count=len(OVERTONES)))
    low = gain_of(low_db) * resonate(x, hz, HOLLOW_WIDTH_HZ)
    upper = gain_of(octave_db) * resonate(x, OCTAVE_RATIO * hz, OCTAVE_WIDTH_HZ)
    for (multiple, width, db), w in zip(OVERTONES, waver):
        upper = upper + gain_of(db) * w * resonate(x, multiple * hz, width)
    return x + low + upper


def scene():
    """Distant hum, air at the ports, bowl and fruit, and the glove close by."""
    air = gusts() + upper_rumble() + pops() + kicks()
    fruit = knock() + scrapes() + squeaks()
    glove = hollow(rustle() + bursts())
    return hum() + air + fruit + glove


def record(dry):
    """The band limit of the recorder."""
    low_pass = signal.firwin(511, EDGE_HZ, window=("kaiser", 9), fs=SR)
    return signal.oaconvolve(dry, low_pass[None], "same")


dry = scene()
out = record(dry)
dump(out)
```